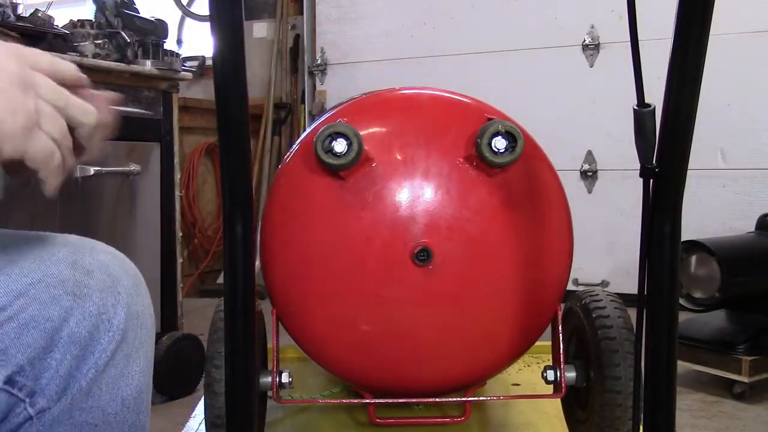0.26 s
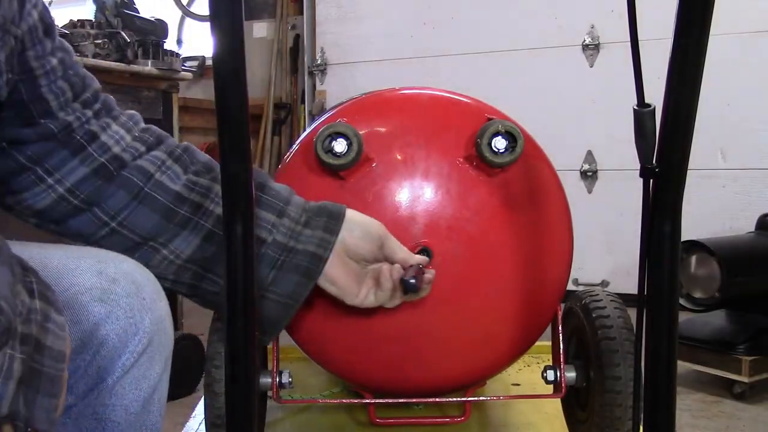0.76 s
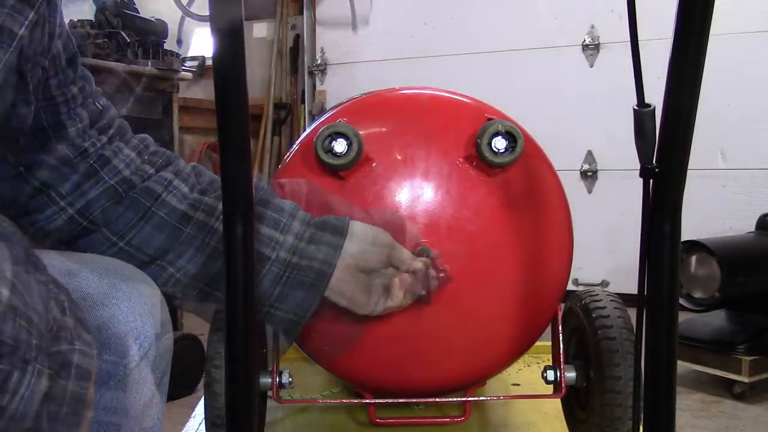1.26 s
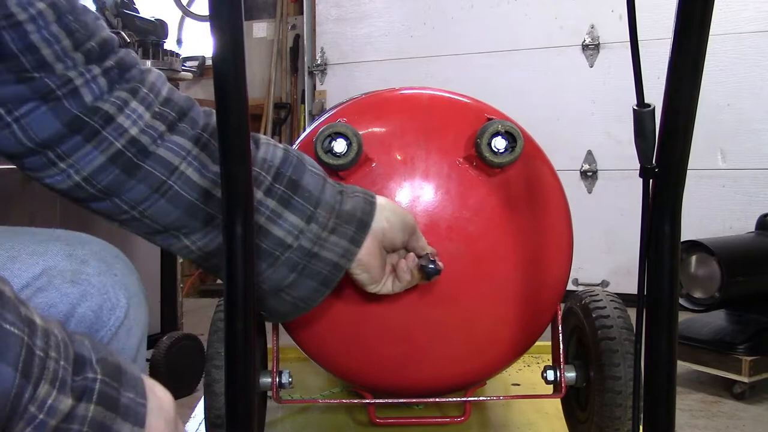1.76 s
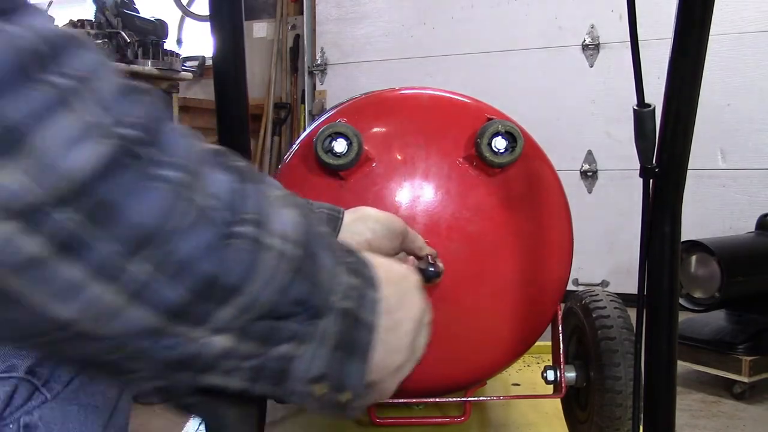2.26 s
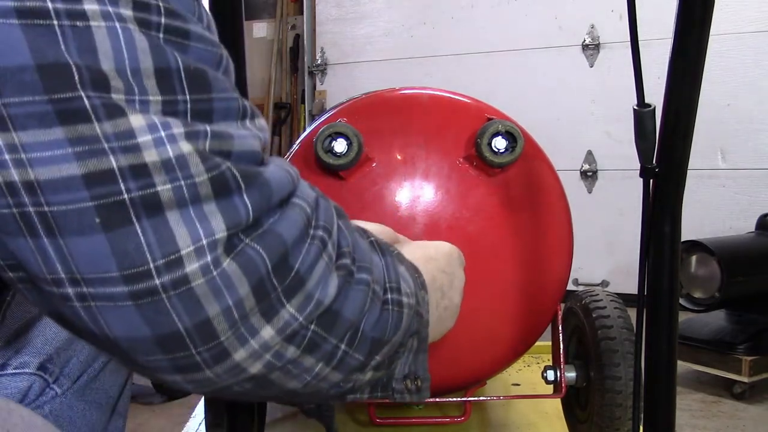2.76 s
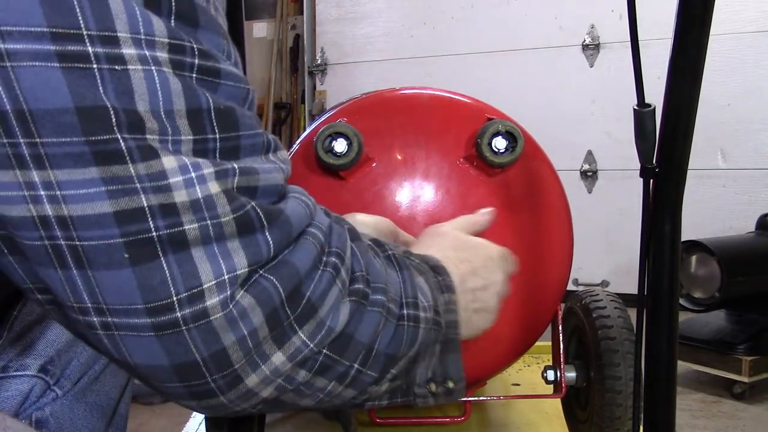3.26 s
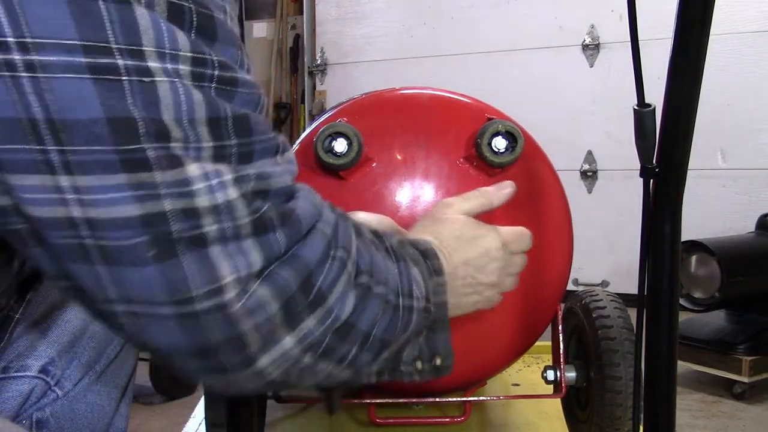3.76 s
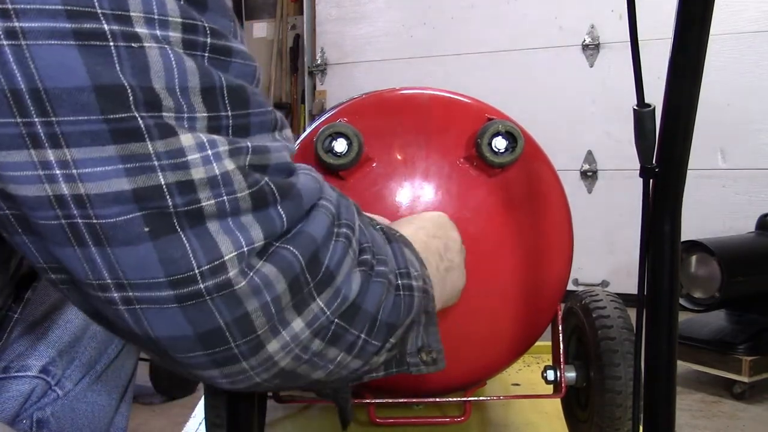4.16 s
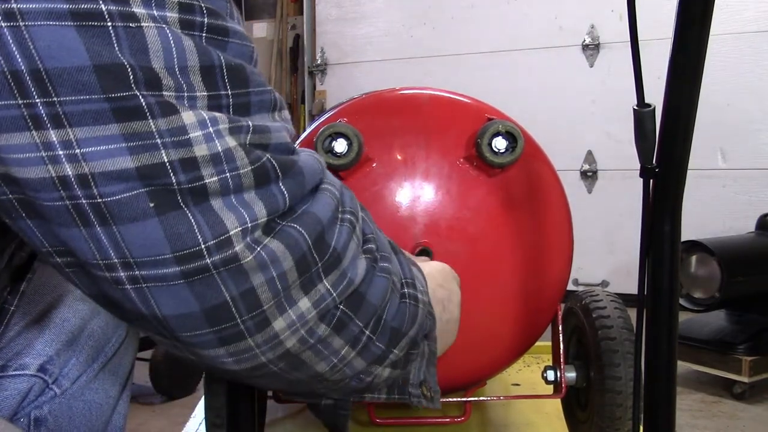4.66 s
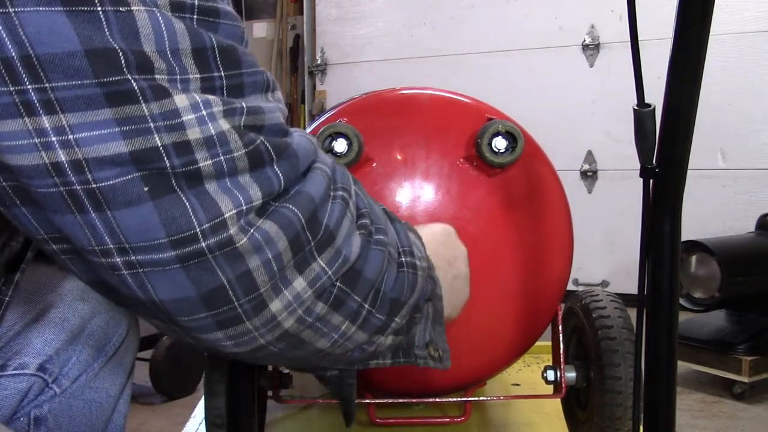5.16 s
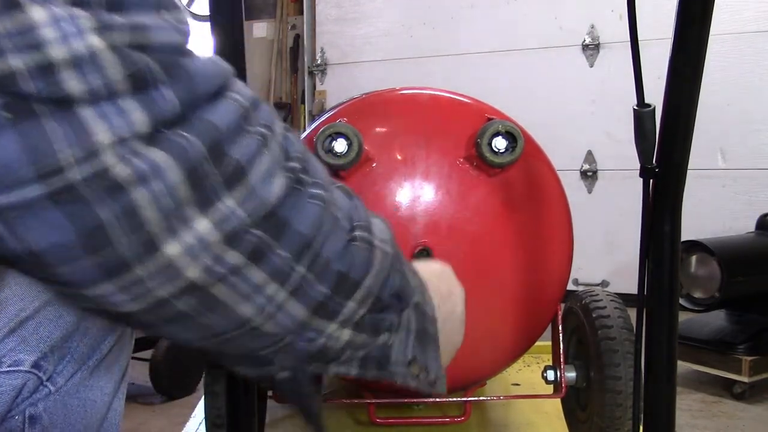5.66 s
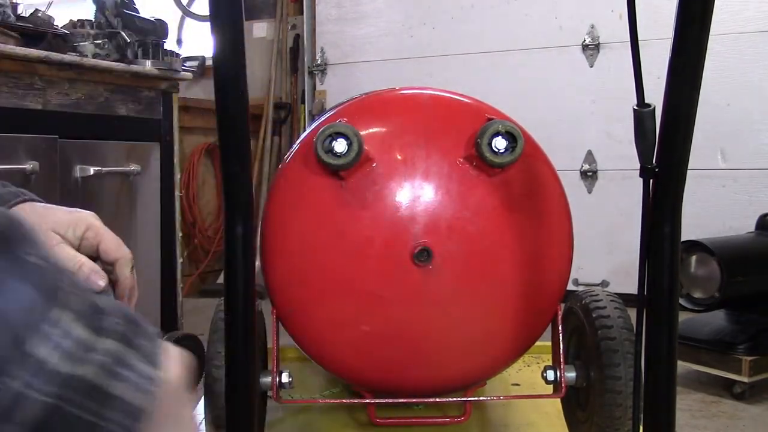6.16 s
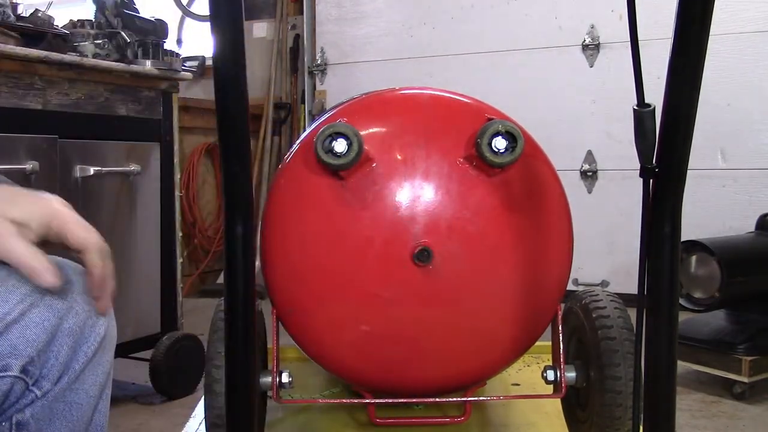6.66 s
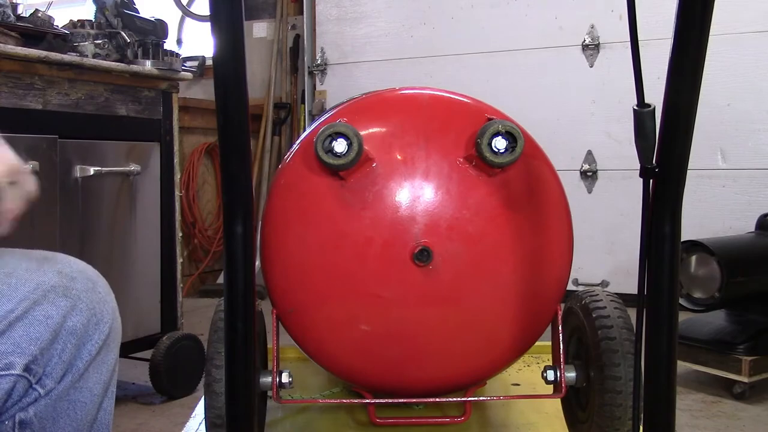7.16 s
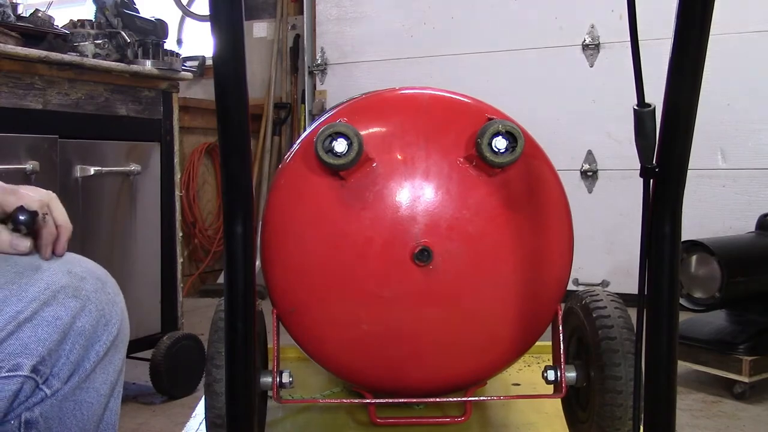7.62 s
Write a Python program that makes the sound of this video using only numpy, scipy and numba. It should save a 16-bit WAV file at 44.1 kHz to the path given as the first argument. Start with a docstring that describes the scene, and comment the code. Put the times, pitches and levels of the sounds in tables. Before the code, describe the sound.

Quiet workshop air, gently swelling over a barely audible hum, heard close with a short room tail. At 0.25-0.55 s small clicks and a scrape lead to a strong dull knock. Light taps and knocks follow around 0.95-1.45 s, then a faint airy slide. From 1.7 to 2.0 s bright steel clicks and gritty scratches cluster, with small ticks after. A heavier knock lands at 2.5 s, ringing clicks at 2.8-2.9 s, and hard tank blows at 3.5 and 3.87 s. Immediately thin air hisses with breathy whistles, wavering, swelling near 5.1 and 5.4 s among a few clicks. At 5.53 s air bursts out loudly, wet and popping, then becomes a bright fluttering rush with occasional spits. At 7.67 s a low thump, stronger on the right, cuts it; a weaker, distant hiss continues with tiny drop-outs until about 7.9 s.

```python
"""Workshop air swells and sinks over a faint hum: band-coloured noise and one sine. A pointed tool taps, clicks
and scrapes at the drain hole of a steel air tank: noise puffs and ringing modes. A palm drives it in and air
leaks and whistles past the tip, then bursts out as a loud spitting jet: noise shaped in moving bands. After a
low thump the near sound stops and a softer hiss follows, with short drop-outs."""
import sys
import numpy as np
from scipy import signal
from scipy.fft import rfft, irfft, next_fast_len
from scipy.io import wavfile
from scipy.ndimage import uniform_filter1d
from numba import njit

SR = 44100
rng = np.random.default_rng(int(sys.argv[2]) if len(sys.argv) > 2 else 0)


def digitize_waveform(pressure):
    """Quantize a signal to 16-bit integers and store it at the path in sys.argv[1].

    Rows of a 2-D input are taken as channels; values are limited to [-1, 1].
    """
    field = np.atleast_2d(pressure).T
    bounded = np.clip(field, -1, 1)
    quanta = np.round(bounded * 32767).astype(np.int16)
    wavfile.write(sys.argv[1], SR, quanta)


N = 347949  # samples in the scene

BURST_S = 5.53  # the hole opens
THUMP_START_S, NEAR_STOP_S = 7.669, 7.7035  # the thump leans in, then the near sound stops


def undb(db):
    """Amplitude factor of a level in dB."""
    return 10 ** (np.asarray(db) / 20)


def sum_db(*dbs):
    """Level in dB of unrelated sounds together: their powers add."""
    return 10 * np.log10(sum(undb(db) ** 2 for db in dbs))


def unit(x):
    """Scale to rms 1."""
    return x / np.sqrt(np.mean(x ** 2) + 1e-30)


def peak(x, db):
    """Scale to a peak level in dB."""
    return x * undb(db) / np.abs(x).max()


def add(out, s, x):
    """Mix x into out from time s on."""
    i = int(s * SR)
    x = x[..., :max(out.shape[-1] - i, 0)]
    out[..., i:i + x.shape[-1]] += x


def on_log(hz, table):
    """Value of an (Hz, value) table, straight on a log frequency axis."""
    table = np.array(table, float)
    return np.interp(np.log(np.maximum(hz, 1)), np.log(table[:, 0]), table[:, 1])


def curve(rows, start, stop):
    """Sample times and the columns of a curve, one value a sample."""
    s, *columns = np.transpose(rows)
    t = np.arange(start, stop, 1 / SR)
    return t, [np.interp(t, s, column) for column in columns]


def stroke_db(t, s, rise, hold, fall):
    """0 dB while it holds; 20 dB down one rise before and one fall after."""
    before = (s - t) / max(rise, .002)
    after = (t - s - hold) / max(fall, .002)
    return -20 * np.maximum(np.maximum(before, after), 0)


def walk(n, rate):
    """Random level, spread near 1, that glides to a new value every 1 / rate s."""
    k = max(int(SR / rate), 2)
    held = np.repeat(rng.standard_normal(n // k + 1), k)
    return 1.2 * uniform_filter1d(held, k)[:n]


@njit
def svf(x, hz, width):
    """State-variable band-pass with a moving centre, gain 1 there."""
    y, b, l = np.empty(len(x)), 0., 0.
    for i in range(len(x)):
        g, k = np.tan(np.pi * hz[i] / SR), width / hz[i]
        v = (b + g * (x[i] - l)) / (1 + g * (g + k))
        b, l, y[i] = 2 * v - b, l + 2 * g * v, k * v
    return y


def band(x, hz, width):
    """Band-pass with a fixed centre."""
    return svf(x, np.full(len(x), np.clip(hz, 50., .44 * SR)), float(width))


def band_twice(x, hz, width):
    """Two equal band-passes in a row, for steeper sides."""
    return band(band(x, hz, width), hz, width)


def whistle(n, hz, width):
    """Breathy tone: noise through two moving band-passes, rms 1."""
    return unit(svf(svf(rng.standard_normal(n), hz, width), hz, width))


def burst(ms):
    """A short puff of noise, quick to rise, slower to die."""
    ms = max(ms, .2)
    t = np.arange(int(ms * 4e-3 * SR)) / SR * 1000 / ms  # time in units of ms
    return rng.standard_normal(len(t)) * (1 - np.exp(-12 * t)) * np.exp(-2 * t)


def ring(modes, scatter_db):
    """One blow's response: every mode is a cluster, so its phase wanders as it dies. Peak 1."""
    hz, rough, db, t60 = np.transpose(modes)[:, :, None]
    t = np.arange(int(min(t60.max(), 1) * SR)) / SR
    drift = uniform_filter1d(rng.standard_normal((len(modes), len(t))), size=50)
    wander = np.cumsum(drift, axis=1) * np.sqrt(2 * np.pi * np.abs(rough) / SR)
    size = undb(db + scatter_db * rng.standard_normal(hz.shape))
    fade = np.exp(-np.log(1000) * t / np.maximum(t60, .005))
    y = np.sum(size * fade * np.sin(2 * np.pi * hz * t + wander), axis=0)
    return y / np.abs(y).max()


def swell(sound, ms):
    """A ring that builds up while the contact lasts."""
    return sound * (1 - np.exp(-np.arange(len(sound)) / SR * 1000 / max(ms, .2)))


def steady(n, colour):
    """Noise of a fixed colour, mid and side, rms 1."""
    noise = rng.standard_normal((2, n))
    return unit(irfft(rfft(noise) * undb(on_log(np.fft.rfftfreq(n, 1 / SR), colour)), n))


def wide(n, width):
    """Mid noise combed by nearby echoes, and a weaker unrelated side noise."""
    mid, side = rng.standard_normal((2, n))
    t = np.arange(int(.3 * SR)) / SR
    echoes = rng.standard_normal(len(t)) * np.exp(-np.log(1000) * t / 0.11)  # T60 0.11 s
    mid = mid + undb(-10) * unit(irfft(rfft(mid) * rfft(echoes, n), n))
    hz = np.fft.rfftfreq(n, 1 / SR)
    return np.array([unit(mid), irfft(rfft(side) * undb(on_log(hz, width)), n)])


def shaped(source, colour, part_db, flicker_db, flicker_rate, shell=0):
    """Third-octave bands of a source; their levels follow five moving bands and flicker alone."""
    # Edges of the five bands in Hz: bass, middle, 3.5-7 kHz, treble, top.
    edges_hz = [150, 1100, 3500, 7000, 10500, 16000]
    # The shell and frame lift and notch the hiss.
    # Each row: centre in Hz, width in Hz, lift in dB at shell = 1.
    shell_lifts = [(3100, 250, 4), (4580, 60, 5), (4750, 150, -4), (4965, 60, 4), (5270, 30, 4),
                   (5345, 30, 6), (5400, 40, 7), (5550, 40, 6), (5860, 200, 2), (6190, 170, 4),
                   (6580, 200, -4), (6850, 60, -4), (8215, 60, 3), (8720, 150, 3), (9100, 70, -4),
                   (9470, 250, 3), (9770, 120, -6), (10000, 200, 2), (10400, 300, -3), (12550, 400, 3),
                   (14400, 300, 5)]
    n = source.shape[-1]
    size = next_fast_len(n)
    hz = np.fft.rfftfreq(size, 1 / SR)
    lift_db = sum(db / (1 + (2 * (hz - f) / width) ** 2) for f, width, db in shell_lifts)
    spec = rfft(source, size) * undb(on_log(hz, colour) + shell * lift_db)

    # the mid's own level in each band, taken off so that part_db sets it
    power = np.abs(np.atleast_2d(spec)[0]) ** 2 * 2 / size / n
    norm_db = [10 * np.log10(power[(hz > a) & (hz < b)].sum()) for a, b in zip(edges_hz, edges_hz[1:])]
    gain_db = part_db - np.array(norm_db)[:, None]

    step, place = np.log(2) / 3, np.log(np.maximum(hz, 1))
    middles = np.log(np.multiply(edges_hz[1:], edges_hz[:-1])) / 2
    out = 0
    for centre in np.arange(np.log(40), np.log(20000), step):
        share = np.clip(1 - np.abs(place - centre) / step, 0, 1)
        weight = [np.interp(centre, middles, row) for row in np.eye(len(middles))]
        db = np.dot(weight, gain_db) + flicker_db * walk(n, flicker_rate)
        out = out + irfft(spec * share, size)[..., :n] * undb(db)
    return out


def shop():
    """Workshop air: noise that swells and sinks, widest in the bass, with a faint sine hum."""
    # Colour of the air. Each row: frequency in Hz, relative level in dB per Hz.
    colour = [(18, -52), (30, -43), (153, -11.5), (184, -9), (210, -12), (239, -9), (374, -5.5),
              (486, -9.5), (554, -7.5), (721, -11), (1100, -10.5), (5900, -21), (16000, -34.5)]
    # Swell of the air. Each row: time in seconds, level in dB.
    level = [(0, -54), (.3, -53.5), (.8, -57), (1.1, -57.5), (1.5, -52), (2.4, -52.5), (2.75, -56.5),
             (3.2, -60.5), (3.45, -55), (3.8, -59.5)]
    # Stereo width. Each row: frequency in Hz, side level in dB from the mid.
    width = [(60, -3), (110, -13), (200, -10), (380, -13), (700, -11.5), (1290, -16), (2380, -16),
             (4400, -14), (8120, -16), (15000, -19)]
    hum_hz, hum_db = 240, -69  # rms level
    t = np.arange(N) / SR
    mid, side = steady(N, colour)
    side = irfft(rfft(side) * undb(on_log(np.fft.rfftfreq(N, 1 / SR), width)), N)
    air = np.array([mid, side]) * undb(np.interp(t, *np.transpose(level)))
    air[0] += undb(hum_db) * np.sqrt(2) * np.sin(2 * np.pi * hum_hz * t)
    return air


def room(dry):
    """Workshop tail, mid and side: noise whose octave bands die at their own rates."""
    # Each row: frequency in Hz, time to die by 60 dB in seconds.
    room_t60 = [(150, 0.11), (700, 0.33), (2000, 0.1), (6000, 0.42), (14000, 0.17)]
    tail_db, side_db = -7.5, -16.5  # side is taken from the tail's level
    t = np.arange(int(.6 * SR)) / SR
    tail = 0
    for hz in 125 * 2. ** np.arange(8):
        onset = np.clip(t / 0.0018, 0, 1)
        fade = np.exp(-np.log(1000) * t / on_log(hz, room_t60)) * onset
        tail = tail + fade * np.array([band(rng.standard_normal(len(t)), hz, hz) for _ in range(2)])
    tail = tail / np.sqrt(np.sum(tail[0] ** 2)) * undb([[tail_db], [tail_db + side_db]])
    return signal.fftconvolve(tail, dry[None])[:, :N]


def thuds():
    """The cart's frame and wheels shake after a palm blow: deep, dull puffs of low noise."""
    # Each row: start in seconds, peak in dB.
    shakes = [(0.533, -61), (2.506, -56), (3.505, -53), (3.862, -52), (4.061, -45)]
    out = np.zeros(N)
    for s, db in shakes:
        add(out, s, peak(band_twice(burst(89), 139, 170), db))
    return out


def knocks():
    """Dull knocks of hand, handle and cart: a soft noise push, the cart's modes and a bright edge."""
    # Each row: start in seconds, peak in dB, centre in Hz, contact in ms,
    # then cart ring and bright part in dB from the peak.
    blows = [(0.406, -26.5, 1040, 15, -11.5, -10), (0.485, -25, 1050, 16, -7, -2.5),
             (0.534, -11, 920, 12.3, -10, -14), (0.699, -39.5, 810, 15, -7.5, -6),
             (1.19, -37, 406, 13, -9, -22), (1.306, -32, 700, 11, -7.5, -5),
             (1.33, -33, 336, 5.9, -0.5, -17), (1.365, -37, 328, 7.7, -6, 0),
             (1.869, -30, 549, 8.9, -3, -11), (2.501, -30, 431, 23, 6, 3.5),
             (2.516, -19, 452, 8.1, -6, 1.5), (2.688, -44, 659, 17, -9, -25),
             (3.529, -35.5, 1200, 15, -1, 4), (3.625, -40.5, 355, 19, -4.5, -24),
             (3.86, -30, 1160, 11, -1, 4), (4.062, -27, 450, 8.6, -3.5, -18)]
    # Cart modes. Each row: frequency in Hz, roughness in Hz, level in dB, T60 in seconds.
    cart = [(235, 59, -14, 0.19), (343.5, 114, 5.5, 0.15), (447, 140, -1, .35), (812, 250, -10, 0.48),
            (1080, 124, -8, 0.29), (1270, 200, -5.5, 0.22), (1615, 210, -10, 0.28), (1970, 340, -5, 0.27),
            (2410, 640, -7.5, 0.22), (3130, 580, -10, 0.16), (5130, 1500, -12, 0.2)]
    out = np.zeros(N)
    for s, db, hz, ms, tail_db, bright_db in blows:
        push = np.pad(burst(ms), (0, 600))
        tail = swell(band(ring(cart, 0.57), hz, 11.4 * hz), .5 * ms)
        add(out, s, peak(band_twice(push, hz, 1.26 * hz), db))
        add(out, s, peak(tail, db + tail_db))
        add(out, s, peak(band_twice(push, 2400, 5700), db + bright_db))
    return out


def clicks():
    """Hard little clicks of steel on steel: a tick of noise, a top part and the tool's ringing modes."""
    # Each row: start in seconds, peak in dB, centre in Hz, then top part and tool ring in dB from the peak.
    ticks = [(0.2423, -46, 2230, -19, -17), (0.394, -21, 6320, -25, -21), (0.4374, -21, 5390, -25, -13),
             (1.2324, -49, 5100, -34, -20), (1.253, -22.5, 3260, -33, -9), (1.2864, -43, 4470, -16, -19),
             (1.704, -16, 5100, -20, -16), (1.7222, -11, 5400, -26, -14), (1.728, -28, 3730, -21, -12),
             (1.7377, -12, 2370, -20, -27), (1.7414, -23, 2350, -19, -20), (1.7834, -30, 5430, -25, -19),
             (1.813, -17, 4900, -27, -24), (1.8204, -30, 5700, -27, -12), (1.8762, -19, 2540, -35, -27),
             (1.8855, -31, 2490, -28, -12), (1.9076, -45, 2350, -49, -23), (2.1204, -56, 2677, -21, -18),
             (2.1645, -35, 6050, -19, -21), (2.1994, -35, 6620, -25, -21), (2.2528, -35, 2480, -24, -20),
             (2.2762, -35, 5930, -19, -21), (2.7898, -15, 3660, -18, -10), (2.8792, -12.5, 3560, -12, -8.5),
             (3.301, -35, 2200, -24, -7), (3.3109, -46, 2420, -26, -14), (4.788, -38, 2200, -20, -20),
             (4.832, -26, 5900, -20, -27), (4.947, -26, 5940, -20, -32), (5.386, -17, 5900, -20, -24),
             (5.444, -16, 5050, -20, -26)]
    # Tool modes. Each row: frequency in Hz, roughness in Hz, level in dB, T60 in seconds.
    tool = [(1420, 100, -3, .22), (1728, 60, -4, .3), (2300, 300, -8, .12), (3550, 300, -3, .2),
            (4300, 300, -7, .22), (3750, 300, 2, .03), (6300, 800, -6, .05), (7600, 1200, -5, .06)]
    out = np.zeros(N)
    for s, db, hz, top_db, ring_db in ticks:
        tick = np.pad(burst(0.96), (0, 200))
        add(out, s, peak(band_twice(tick, hz, 0.81 * hz), db))
        add(out, s, peak(band_twice(tick, 13000, 9000), db + top_db))
        add(out, s, peak(ring(tool, 0.26), db + ring_db))
    return out


def taps():
    """Tool tip against the tank: a thud of the hand-damped patch of wall, ringing modes and a crack."""
    # Each row: start in seconds, thud peak in dB, push in ms, then crack and tank ring in dB from the thud.
    blows = [(0.954, -41, 0.84, -18, -9), (1.179, -25, 0.95, -30, -21), (1.2172, -52, 2.2, -15, -6),
             (1.312, -30, 2.2, -16, -4), (1.441, -43, 2.3, -18, -6), (1.4571, -46, 2, -18, -6),
             (2.915, -31, 0.75, -18, -7.5), (3.0182, -42, 2, -18, -1), (3.5044, -20, 2.5, -15, -2.5),
             (3.5095, -12.5, 2.1, -5, -8), (3.861, -13, 1.6, -17, -5.5), (3.868, -23, 1.9, -15, -3),
             (3.874, -14, 2.4, -15, -1.5), (3.878, -7, 1.3, -10.5, -7.5)]
    # Tank modes. Each row: frequency in Hz, roughness in Hz, level in dB, T60 in seconds.
    tank = [(429, 87, -9, 0.062), (1160, 6.8, -31, 0.64), (1390, 99, 1, 0.088), (1336, 56, -10, 0.18),
            (1362, 113, -5, 0.11), (1486, 8, -19, 1.2), (1710, 54, -36, 0.33), (1980, 91, -5.5, 0.16),
            (2347, 83, -3, 0.075), (2440, 21, -13, 0.27), (2960, 180, -16, 0.24), (3280, 420, -8.5, 0.091),
            (3750, 72, -11.5, 0.12), (4470, 260, -21, 0.34)]
    thud_hz, thud_width_hz = 1435, 190
    out = np.zeros(N)
    for s, db, ms, crack_db, ring_db in blows:
        push = np.pad(burst(ms), (0, 600))
        add(out, s, peak(band_twice(push, thud_hz, thud_width_hz), db))
        add(out, s, peak(swell(ring(tank, 0.46), .5 * ms), db + ring_db))
        add(out, s, peak(band(push, 2700, 5500), db + crack_db))
    return out


def slide():
    """The tip glides lightly: an airy noise band that rises over a fixed tool resonance."""
    # Each row: time in seconds, level in dB, rising band in Hz, lower part in dB from the level.
    glide = [(1.43, -62, 3970, -3), (1.48, -61, 4200, -5), (1.54, -58, 4440, -9), (1.62, -57, 4530, 0),
             (1.685, -57, 4650, 4)]
    s, db, hz, low_db = np.transpose(glide)
    t = np.arange(N) / SR
    noise = rng.standard_normal(N)
    hz = np.interp(t, s, hz)
    rising = unit(svf(svf(noise, hz, 750.), hz, 750.))
    below = unit(band(noise, 1700, 70)) + 0.52 * unit(band(noise, 2200, 2600))
    gate = uniform_filter1d(1. * (t > s[0]) * (t < s[-1]), size=800)
    return gate * undb(np.interp(t, s, db)) * (rising + undb(np.interp(t, s, low_db)) * below)


def scrapes(grains_per_s=2000, smooth_db=-1):
    """Steel on rusty paint: grains of unequal size over a smooth rub."""
    # Strokes of the tip. Each row: start of the hold in seconds, 3.5-7 kHz level in dB,
    # rise, hold and fall in seconds (rise and fall span 20 dB), then bass, middle and treble in dB from it.
    strokes = [(0.342, -45.5, 0.15, 0.034, 0.013, 1, -6, -2),
               (0.394, -37, 0.018, 0.026, 0.028, -8, -3.5, -7),
               (0.479, -43.5, 0.0063, 0.006, 0.0068, -7, 8.5, -9),
               (1.312, -56.5, 0.0098, .003, 0.14, 7, 12.5, 0), (1.672, -50, 0.011, .02, .02, -1, -6, -16),
               (1.728, -26.5, 0.035, 0.0022, 0.046, -16, -2, -6.5),
               (1.775, -38, .03, 0.0054, .012, -0.5, -8, -7),
               (1.807, -30.5, 0.038, .002, .028, -17, -6, -10.5),
               (1.875, -42, 0.0055, .002, 0.032, 6, -14, -11), (1.956, -35, .011, .095, .06, -5, -4, -6),
               (2.163, -63, 0.011, .003, 0.041, -5, 4, 3), (2.251, -50.5, .005, .003, 0.053, -17, -8, -0.5),
               (3.314, -46, 0.021, 0.0019, .013, -2, 2, -10)]
    # Colour of the rub. Each row: frequency in Hz, relative level in dB per Hz.
    colour = [(88, -23), (150, -18), (383, -12), (675, -9), (960, -5.5), (1100, -9.5), (1390, 0.5),
              (1600, 3.5), (2310, 3.5), (4410, -8), (5790, -4.5), (13700, -23), (16000, -30)]
    top_db = -6.5  # from the treble
    out = np.zeros(N)
    for s, db, rise, hold, fall, bass, middle, treble in strokes:
        t = np.arange(s - 2 * rise - .01, s + hold + 2 * fall + .01, 1 / SR)
        n = len(t)
        balance = np.array([[bass], [middle], [0], [treble], [treble + top_db]])
        parts = db + stroke_db(t, s, rise, hold, fall) + balance
        size = undb(2.6 * np.minimum(rng.exponential(size=n), 4)) * rng.standard_normal(n)
        grains = unit((rng.random(n) < grains_per_s / SR) * size)
        smooth = undb(smooth_db) * rng.standard_normal(n)
        rub = shaped(grains + smooth, colour, parts, 3.2, 52)
        add(out, t[0], rub * signal.windows.tukey(n, .02 * SR / n))  # 10 ms fades
    return out


def leak():
    """Thin hiss of air past the tip; two breathy whistles move as the gap changes."""
    # Each row: time in seconds, 3.5-7 kHz level in dB, first and second whistle in Hz.
    gap = [(3.875, -38, 5560, 12200), (3.961, -46, 5100, 12400), (4.223, -43, 5560, 12100),
           (4.551, -47.5, 6150, 13000), (4.605, -41.5, 5930, 12800), (4.677, -48.5, 6060, 12800),
           (4.863, -40.5, 6000, 12500), (5.005, -47.5, 6000, 12100), (5.078, -36.5, 6000, 12600),
           (5.092, -27, 5970, 13000), (5.122, -26.5, 6000, 12900), (5.135, -32.5, 6130, 12800),
           (5.195, -36.5, 6240, 12600), (5.359, -37, 5840, 12800), (5.385, -31, 5950, 12600),
           (5.423, -33, 6100, 12800), (5.441, -26.5, 6240, 12600), (5.505, -36.5, 5900, 12300)]
    # Colour of the hiss. Each row: frequency in Hz, relative level in dB per Hz.
    colour = [(88, -59), (150, -28), (235, -33), (291, -23), (475, -19), (504, -29), (534, -16.5),
              (759, -22.5), (923, -13.5), (3220, -10), (4700, -10), (5500, -1.5), (8730, -6), (12700, 5),
              (16000, -5)]
    # Stereo width. Each row: frequency in Hz, side level in dB from the mid.
    width = [(60, -4), (110, -6), (200, -20), (380, -17), (700, -21), (1290, -43), (2380, -73), (4400, -18),
             (8120, -27), (15000, -59)]
    # Five bands, bass to top: dB from the 3.5-7 kHz level when that stands at its usual level.
    bands_db = [-13.5, -9, -2, -3, -4]
    # Five bands, bass to top: share of a swell that each does not follow.
    lag = [0, 0, 0.038, 0.15, 0.9]
    usual_db = -42
    t, (level_db, first_hz, second_hz) = curve(gap, gap[0][0], BURST_S)
    n = len(t)
    parts = level_db + np.array(bands_db)[:, None] - np.outer(lag, level_db - usual_db)
    air = shaped(wide(n, width), colour, parts, 1.5, 8, shell=.7)
    air[0] += undb(parts[2] - 3 + 0.8 * walk(n, 10.3)) * whistle(n, first_hz, 750.)
    air[0] += undb(parts[4] - 5 + 0.8 * walk(n, 10.3)) * whistle(n, second_hz, 900.)
    return t[0], air


def jet():
    """Turbulent jet from the open hole; eddies make the whole hiss flutter, and drops pop in its low end."""
    # Each row: time in seconds, 3.5-7 kHz level in dB, treble level in dB.
    flow = [(5.54, -18, -22.5), (5.68, -11.5, -21.5), (5.76, -13.5, -17), (5.97, -16, -14.5),
            (6.08, -14.5, -16), (6.49, -16.5, -16.5), (6.51, -11, -14), (6.57, -13.5, -17.5),
            (6.61, -13.5, -16), (7.25, -17, -17.5), (7.59, -15.5, -17), (7.7, -20, -17.5)]
    # Colour of the jet. Each row: frequency in Hz, relative level in dB per Hz.
    colour = [(24, -72), (40, -53), (194, -31.5), (329, -27), (422, -24.5), (630, -22), (1520, -19),
              (3060, -12.5), (4340, -7.5), (4800, -4), (6170, -0.5), (6650, 0), (9220, 3), (13400, -20.5),
              (16000, -23)]
    # Stereo width. Each row: frequency in Hz, side level in dB from the mid.
    width = [(60, -18), (380, -20), (700, -29), (1290, -36), (2380, -46), (4400, -21), (8120, -19),
             (11000, -10), (15000, -2)]
    # Drops of water and rust spat out. Each row: start in seconds, peak in dB, centre in Hz, length in ms.
    spits = [(5.546, -5.5, 1230, 3.3), (5.635, -12, 589, 6.6), (5.683, -7.5, 654, 10.6),
             (5.868, -14.5, 1230, 3.6), (5.939, -22, 690, 3.3), (6.002, -12, 810, 7.5),
             (6.028, -12.5, 570, 4.8), (6.188, -14, 655, 4.1), (6.496, -20.5, 333, 4),
             (6.518, -19.5, 1030, 4.4), (6.598, -20, 1280, 6.5), (6.776, -19, 1410, 1.8),
             (7.019, -13.5, 1120, 5.1)]
    bass_db, middle_db, top_db = -29.5, -11, -7  # from the treble
    # wet low roar as the hole clears
    sputter_db, sputter_middle_db, sputter_hold_s, sputter_fall_s = -25.5, -19, 0.15, 0.22
    # bass puff behind each drop, from its peak; time to fall 20 dB
    rumble_db, rumble_s = -19, 0.065
    crack_db = -4  # bright edge of each drop, from its peak
    whistle_hz, whistle_width_hz, whistle_db = 6040, 1600, -14.5  # while the hole clears

    t, (body_db, treble_db) = curve(flow, BURST_S, NEAR_STOP_S)
    n = len(t)
    clearing = stroke_db(t, t[0], 1, sputter_hold_s, sputter_fall_s)
    puffs = [db + rumble_db + stroke_db(t, at, 0.0049, 0, rumble_s) for at, db, _, _ in spits]
    parts = np.array([sum_db(treble_db + bass_db, sputter_db + clearing, *puffs),
                      sum_db(treble_db + middle_db, sputter_middle_db + clearing),
                      body_db, treble_db, treble_db + top_db])
    flutter = 0.25 * walk(n, 60.7)
    air = shaped(wide(n, width), colour, parts + flutter, 0.71, 13.87, shell=0.89)
    tone = unit(band_twice(rng.standard_normal(n), whistle_hz, whistle_width_hz))
    air[0] += undb(whistle_db + clearing) * tone
    for at, db, hz, ms in spits:
        pop = band(np.pad(burst(ms), (0, 400)), hz, 0.81 * hz)
        add(air[0], at - t[0], peak(band(pop, 2.7 * hz, 7.8 * hz), db))
        crack = band(np.pad(burst(ms), (0, 400)), 1470, 1700)
        add(air[0], at - t[0], peak(crack, db + crack_db))
    return t[0], air


def ending(near):
    """Left and right: a low thump, louder on the right, the near sound stops, then a softer hiss in pieces."""
    # Colour of the later hiss. Each row: frequency in Hz, relative level in dB per Hz.
    colour = [(24, -34), (40, -3), (163, -7.5), (585, -5.5), (831, -7), (1120, -4), (2150, -6),
              (2380, -4.5), (4460, -5), (5310, -4), (16000, -7.5)]
    # Pieces of the later hiss, almost silent between. Each row: start and end in seconds.
    pieces = [(7.7115, 7.7728), (7.7785, 7.806), (7.811, 7.8665), (7.877, 7.9)]
    thump_db, thump_rise_ms = (-23.5, -19.5), 5  # left and right
    later_db, later_side_db, floor_db = -28.5, -34, -49  # side from the later hiss's mid
    t = np.arange(N) / SR
    lean = 1 - np.exp(-np.maximum(t - THUMP_START_S, 0) * 1000 / thump_rise_ms)
    out = (near - undb(thump_db)[:, None] * lean) * (t < NEAR_STOP_S)
    out += (t >= NEAR_STOP_S) * undb(floor_db) * steady(N, colour)[0]
    for start, end in pieces:
        mid, side = steady(int((end - start) * SR), colour)
        add(out, start, undb(later_db) * (mid + undb(later_side_db) * side * np.array([[1], [-1]])))
    return out


def scene():
    """Contact sounds with their room tail, the air, leak and jet; then the ending in left and right."""
    contacts = taps() + clicks() + knocks() + scrapes() + slide()
    # small struck parts radiate little deep bass
    dry = signal.sosfilt(signal.butter(2, 180, "high", fs=SR, output="sos"), contacts)
    near = room(dry) + shop()
    near[0] += dry + thuds()
    add(near, *leak())
    add(near, *jet())
    mid, side = signal.sosfilt(signal.butter(1, 40, "high", fs=SR, output="sos"), near)
    return ending(np.array([mid + side, mid - side]))


def record(dry):
    """The input rounds the loudest peaks and cuts the top above 15760 Hz."""
    low_pass = signal.ellip(14, .3, 80, 15760, fs=SR, output="sos")
    return signal.sosfilt(low_pass, np.tanh(0.73 * dry) / 0.72)


dry = scene()
out = record(dry)
digitize_waveform(out)
```